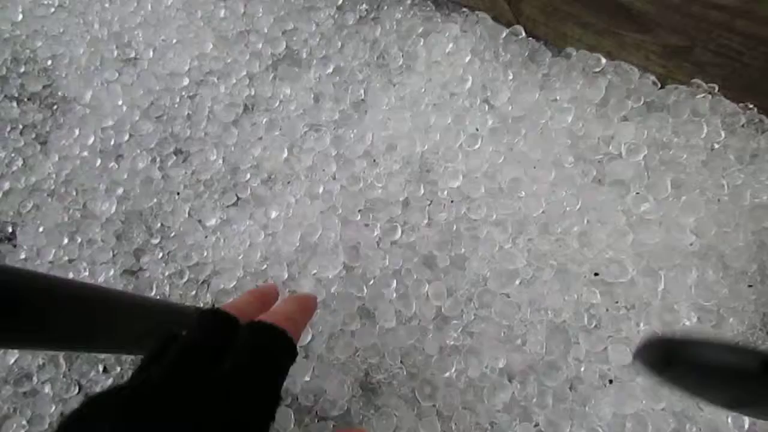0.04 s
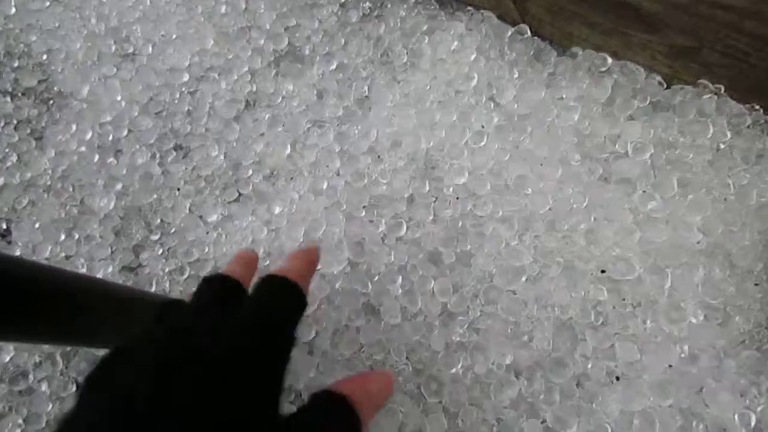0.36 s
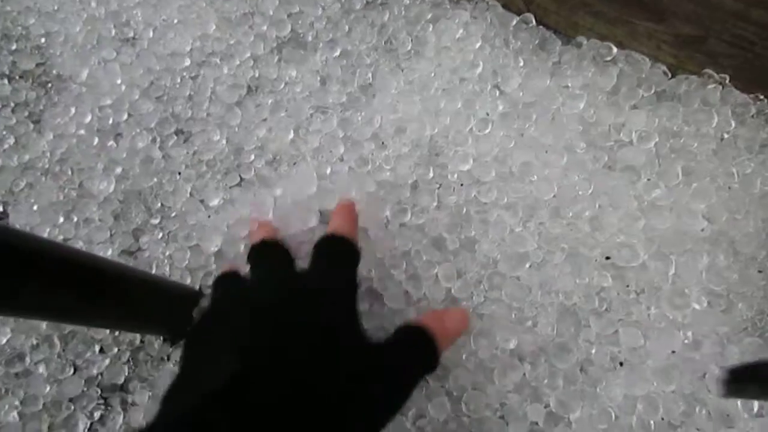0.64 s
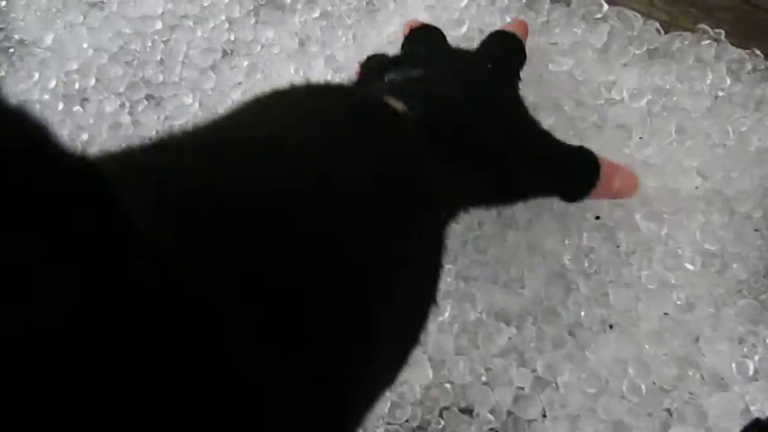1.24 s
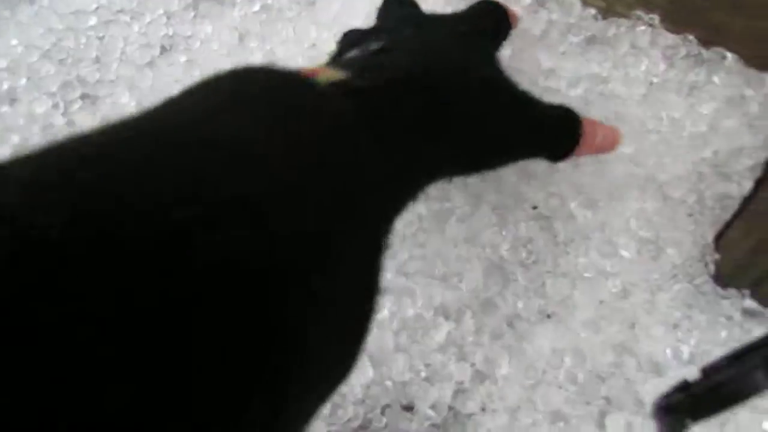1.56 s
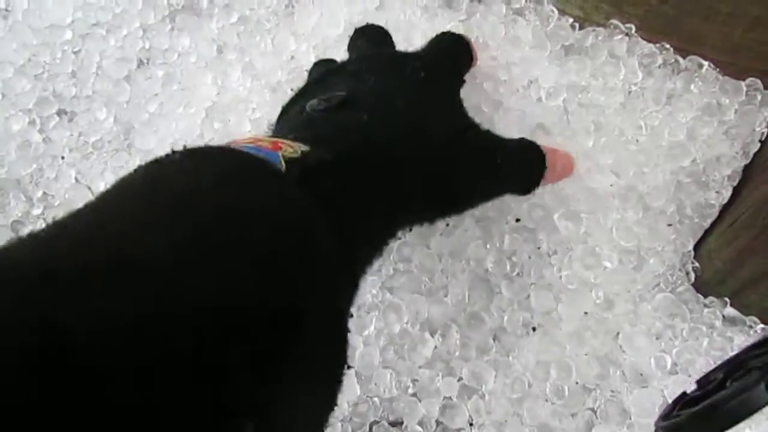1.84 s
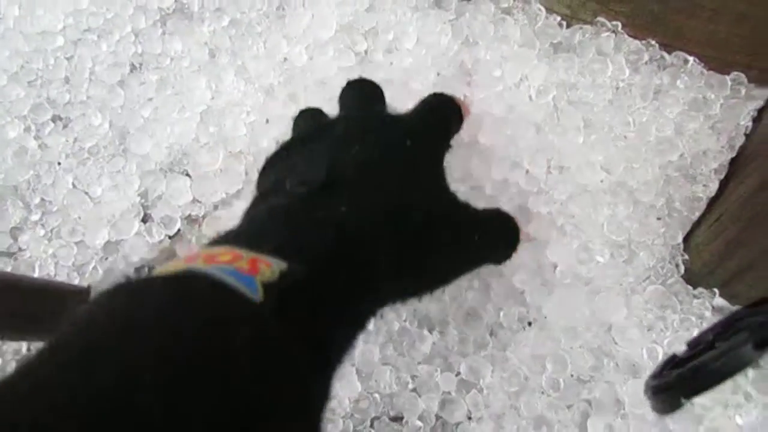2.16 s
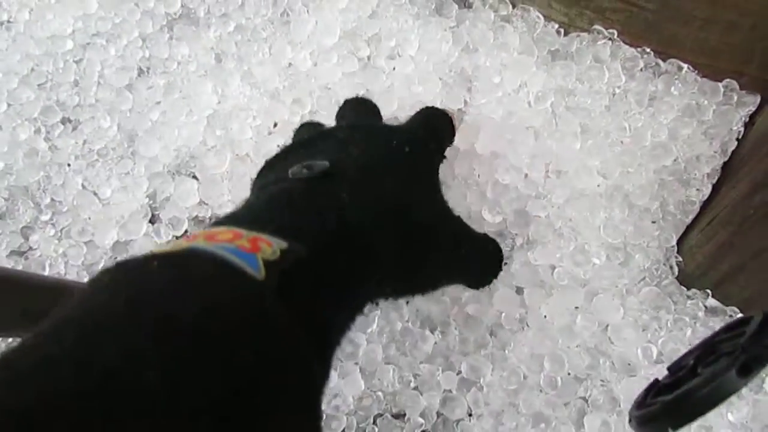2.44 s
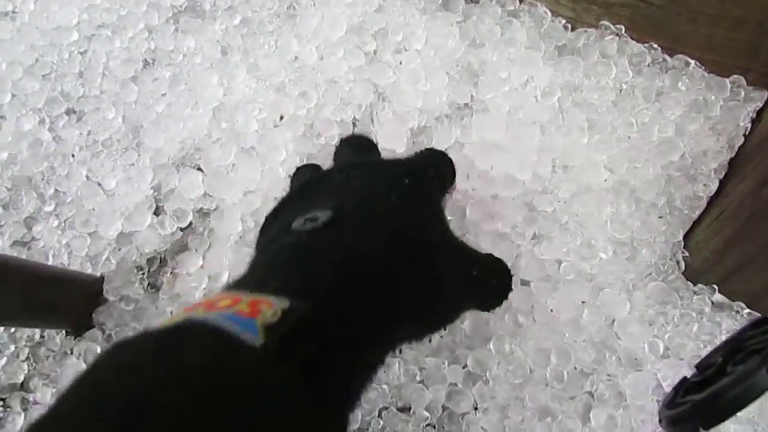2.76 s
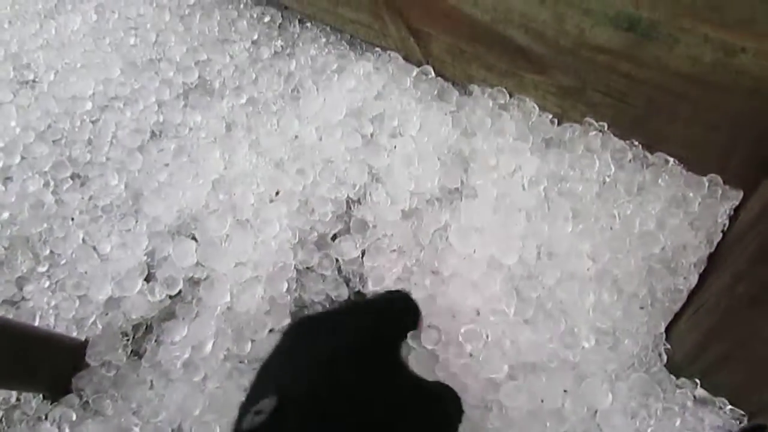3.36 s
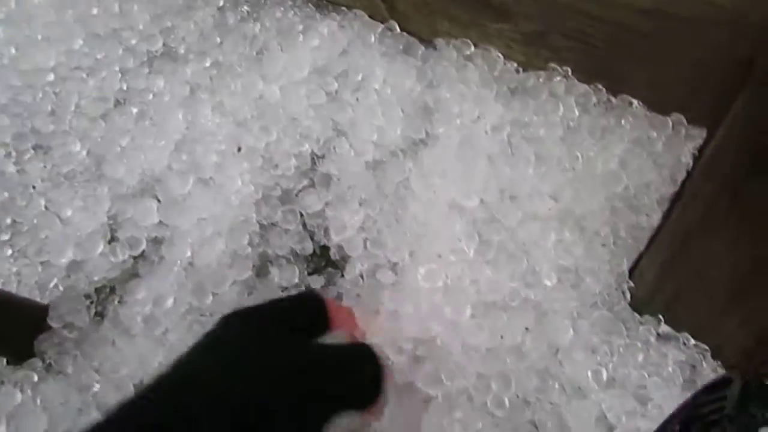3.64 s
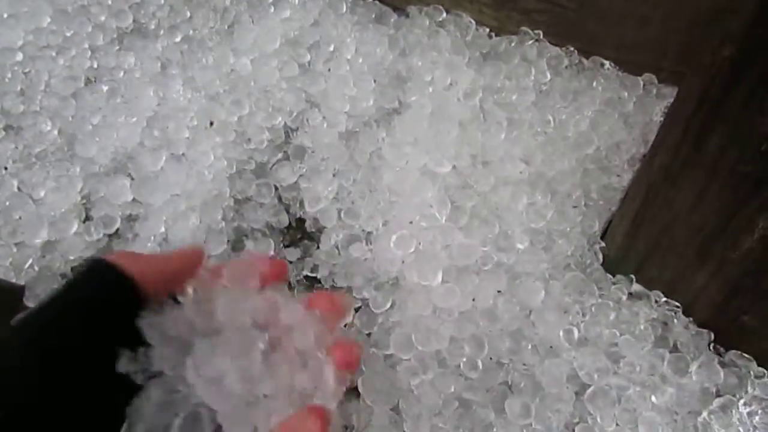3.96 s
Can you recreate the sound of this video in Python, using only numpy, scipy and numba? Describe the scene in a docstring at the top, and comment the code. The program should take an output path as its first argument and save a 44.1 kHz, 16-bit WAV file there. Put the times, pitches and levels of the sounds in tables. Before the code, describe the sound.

Hailstones crunch as a gloved hand rakes through them, with wind rumbling on the microphone.

```python
"""Wet hailstones crunch on a wooden deck as a gloved hand pushes into the heap and rakes them back.
Close to the microphone, the heap gives way in slips: showers of tiny ice contacts over a duller
rattle of the packed stones, with a few sharp snaps. Loose stones trickle back behind the hand.
Wind rumbles on the microphone, mostly on the left, over a faint outdoor hiss."""
import sys
import numpy as np
from scipy import signal
from scipy.fft import rfft, irfft
from scipy.io import wavfile
from numba import njit

SR = 44100
rng = np.random.default_rng(int(sys.argv[2]) if len(sys.argv) > 2 else 0)


def transcribe(u):
    """Save the signal u as a 16-bit wav file named by the first command-line argument.

    u: samples, shape (n,) or (channels, n), limited to [-1, 1]; the rate is SR.
    q: integer samples, one column per channel.
    """
    v = np.clip(np.atleast_2d(u).T, -1, 1)
    q = np.round(v * 32767).astype(np.int16)
    wavfile.write(sys.argv[1], SR, q)


N = 176400
T = np.arange(N) / SR
FREQ_HZ = np.fft.rfftfreq(N, 1 / SR)
SPLIT = np.array([[.5], [-.5]])  # shares a difference between left and right


def crunch(stir, left_louder_db=0.14):
    """Ice rubs on ice: dense tiny contacts, fewer ringing ticks, and sudden snaps."""
    # single stones snapping past each other: time_s, level_db
    snap_list = [(.466, -45), (.481, -27), (0.653, -28), (0.928, -24), (1.033, -25), (1.164, -31),
                 (1.260, -32), (1.396, -36), (1.632, -27), (1.676, -24), (1.690, -37), (1.732, -25.5),
                 (3.804, -32), (3.848, -37), (3.88, -34.5), (3.987, -35.5)]
    # tone of the ice on top of the heap and deep in it: pitch_hz, level_db
    top_ice = [(1200, -5.5), (2400, -3.5), (3100, -3.5), (4400, -4), (6400, 0), (8000, 0), (10500, 2),
               (12500, -3.5), (15500, -8)]
    deep_ice = [(1200, -26), (2400, -10), (3200, -6), (4000, -6), (5000, -5.5), (6400, -1.5), (7800, -1),
                (9200, -4), (11000, -5.5), (12500, -8), (15500, -17.5)]
    snap_fade_s = 0.0031
    snaps = sum(undb(db) * (T >= at) * np.exp(-np.abs(T - at) / snap_fade_s) for at, db in snap_list)
    contacts = grains(per_s=14000, spread_db=1, ring_s=0.00024, low_hz=1110, high_hz=16240)
    ticks = grains(per_s=1100, spread_db=2.5, ring_s=0.0013, low_hz=2310, high_hz=13650)
    ice = dig(contacts + undb(-9) * ticks, top_ice, deep_ice)
    return stereo(ice * np.hypot(stir, snaps)) * undb(-1 + SPLIT * left_louder_db)


def rattle(stir):
    """Packed stones knock together, with a duller tone shaped by the heap and the deck."""
    # tone of the packed stones under a flat hand and a dug-in hand: pitch_hz, level_db
    top_packed = [(60, -30), (150, -7), (300, -2), (430, 4.5), (570, -3), (760, -1), (950, 1), (1160, -5),
                  (1370, 3), (1490, -6.5), (1620, 4.5), (1850, -3), (2300, -4), (3000, -25), (5000, -28)]
    deep_packed = [(60, -30), (150, -17), (300, 4), (430, 0), (600, -4.5), (780, -3.5), (950, 1),
                   (1160, -2.5), (1360, 0.5), (1480, -3), (1600, 8), (1740, 1), (2300, -2.5), (3000, -15),
                   (5000, -30)]
    # how the rattle reaches the microphone's two sides: pitch_hz, left_louder_db, right_earlier_rad
    arrival = [(100, 13, 0), (350, 7.5, 1.48), (550, 4.5, 2.2), (810, 0.5, 1.44), (1040, 1, 0.6),
               (1500, 1, 0.17), (2300, -3.5, 0.51), (3500, -8, 0)]
    knocks = grains(per_s=3000, spread_db=2, ring_s=0.0017, low_hz=197, high_hz=3247)
    knocks = dig(knocks, top_packed, deep_packed)
    reference_db = -39.5
    strength = (stir / undb(reference_db)) ** 0.73  # grows more slowly than the crunch
    pair = stereo(knocks * strength) * undb(reference_db - 6.5)
    hz, left_louder_db, right_earlier_rad = np.array(arrival).T
    balance = undb(SPLIT * np.interp(FREQ_HZ, hz, left_louder_db))
    delay = np.exp(-1j * SPLIT * np.interp(FREQ_HZ, hz, right_earlier_rad))
    return irfft(rfft(pair) * balance * delay, N)


def hand_motion(fade_s=.012):
    """How hard the hand stirs the loose ice and the packed stones: steady drag plus sudden slips."""
    # drag of the hand between the slips: time_s, level_db
    drag = [(.43, -61), (.45, -49.5), (.56, -38), (.68, -33), (.79, -34), (.94, -32), (1.05, -36),
            (1.14, -55), (1.21, -47), (1.30, -47), (1.43, -38), (1.53, -44), (1.58, -46), (1.70, -45),
            (1.755, -43.5), (1.785, -58), (1.875, -51.5), (1.91, -42), (1.97, -35.5), (2.12, -44),
            (2.27, -45), (2.42, -42.5), (2.62, -36), (2.84, -38.5), (2.94, -38.5), (2.975, -58),
            (2.995, -42.5), (3.22, -43.5), (3.33, -32), (3.385, -39.5), (3.45, -44), (3.52, -35),
            (3.78, -42.5), (3.91, -50.5), (4.0, -55)]
    # the heap gives way: start_s, rise_s, hold_s, level_db, extra_rattle_db
    slips = [(0.439, 0.0063, 0.025, -33.5, -2), (.505, 0.0028, 0.01, -33.5, -2),
             (0.808, .005, .009, -24.5, -5), (0.832, .005, .016, -32.5, 6.5),
             (0.921, 0.0073, 0.089, -40.5, 11), (1.06, .005, .012, -38.5, 5.5),
             (1.102, .004, 0.0095, -45, 9), (1.146, 0.0018, .018, -42, 7),
             (1.229, 0.00092, 0.016, -39.5, 2), (1.283, 0.0065, 0.024, -43, 5),
             (1.352, .002, 0.014, -37.5, 2.5), (1.381, 0.004, 0.017, -33.5, 1.5),
             (1.429, 0.02, .004, -30.5, 7), (1.464, 0.0092, .004, -26.5, 7),
             (1.545, 0.0033, 0.0056, -38.5, -2), (1.593, 0.0037, 0.017, -30.5, 2.5),
             (1.635, 0.023, 0.035, -29.5, 5.5), (1.939, .006, .010, -40, 9), (1.952, .003, 0.0073, -26, 0),
             (1.968, 0.028, 0.042, -31.5, 4), (2.051, 0.0074, 0.016, -30, 4),
             (2.082, 0.0068, 0.034, -32, 1.5), (2.134, 0.012, 0.011, -27.5, 3.5),
             (2.178, .005, .010, -35.5, -1), (2.22, .016, 0.0063, -34.5, 1.5),
             (2.282, .005, 0.028, -41.5, 5), (2.325, 0.0042, 0.0096, -26.5, 1.5),
             (2.341, 0.0056, 0.027, -32.5, 3), (2.379, .004, 0.0067, -31, 0),
             (2.441, .010, 0.064, -29.5, 2), (2.501, 0.017, 0.022, -26, 0.5),
             (2.537, 0.0076, 0.029, -29, 4.5), (2.696, 0.0024, 0.0051, -24.5, -0.5),
             (2.721, .004, 0.009, -35, 7.5), (2.739, 0.0095, 0.0035, -27.5, 1.5),
             (2.767, 0.0089, .020, -30.5, 0.5), (2.804, 0.0078, 0.012, -32, -1),
             (2.853, 0.0028, 0.026, -29, 3.5), (3.040, 0.023, 0.013, -30, 0),
             (3.078, 0.01, 0.045, -29, 0.5), (3.133, .008, 0.038, -32.5, 1.5),
             (3.237, 0.015, 0.018, -27, -3.5), (3.267, .008, 0.021, -28, 0.5),
             (3.411, 0.017, 0.011, -42, 2), (3.466, .006, 0.013, -37.5, -14), (3.54, 0.016, .008, -38, -3),
             (3.904, .001, .002, -42, 4)]
    loose_power = curve(drag) ** 2
    packed_power = loose_power.copy()
    for start_s, rise_s, hold_s, level_db, extra_rattle_db in slips:
        age = T - start_s
        rise = np.clip(age / rise_s, 0, 1)
        fade = np.exp(-np.maximum(age - rise_s - hold_s, 0) / fade_s)
        slip = undb(level_db) * rise * fade
        loose_power += slip ** 2
        packed_power += (slip * undb(extra_rattle_db)) ** 2
    return np.sqrt([loose_power, packed_power]) * judder()


def judder(per_s=110, fade_s=.006, depth_db=0.94):
    """Stones stick and slip: tiny random jumps in level that start at once and die away."""
    gaps, sizes = rng.random((4000, 2)).T
    at = (np.cumsum(.5 + gaps) / per_s * SR).astype(int)
    kicks = np.bincount(at[at < N], sizes[at < N] ** 2, N)
    jolts = signal.lfilter([1], [1, -np.exp(-1 / (fade_s * SR))], kicks)
    return undb(depth_db * unit(jolts - jolts.mean()))


def dig(sound, top, deep, start_s=2.02, end_s=3):
    """The tone blends from the top of the heap to deep inside it as the hand sinks in."""
    depth = np.clip((T - start_s) / (end_s - start_s), 0, 1)
    return (1 - depth) * unit(colour(sound, top)) + depth * unit(colour(sound, deep))


def grains(per_s, spread_db, ring_s, low_hz, high_hz):
    """Stones touch at random, each contact with its own pitch, ring time, strength and place."""
    when, pitch, length, force, where = rng.random((int(per_s * N / SR), 5)).T
    hz = low_hz + (high_hz - low_hz) * pitch
    decay_s = ring_s * 2 ** (2 * length - 1)
    strength_db = -spread_db * np.log(np.maximum(force, .01))  # many weak, a few strong
    size = undb(strength_db) / np.sqrt(decay_s)  # a longer ring adds no energy
    place = np.sqrt(3) * (2 * where - 1)
    return unit(ring(when * N / SR, hz, decay_s, size, place))


@njit
def ring(start_s, hz, decay_s, size, place):
    """Each contact rings as a fading tone. Returns the centre sound and the left-right difference."""
    out = np.zeros((2, N))
    for k in range(len(start_s)):
        step = np.exp((2j * np.pi * hz[k] - 1 / decay_s[k]) / SR)
        tone = size[k] + 0j
        first = int(start_s[k] * SR)
        for i in range(first, min(N, first + int(5 * decay_s[k] * SR))):
            tone *= step
            out[0, i] += tone.imag
            out[1, i] += tone.imag * place[k]
    return out


def trickle():
    """Loose stones tumble back behind the hand with light, short clicks."""
    # loudness of the tumbling stones: time_s, level_db
    flow = [(.43, -75), (.5, -46), (1.0, -53), (1.65, -51), (1.8, -78), (2.1, -55), (2.97, -54), (3.5, -42),
            (3.8, -44), (4, -51)]
    # tone of their clicks: pitch_hz, level_db
    click_tone = [(1500, -40), (3000, -6), (4100, 3), (4900, -7), (7000, 0), (11000, 0.5), (15000, -8)]
    clicks = grains(per_s=2200, spread_db=2.6, ring_s=.0006, low_hz=2930, high_hz=15600)
    return stereo(unit(colour(clicks, click_tone))) * curve(flow)


def wind(flutter_db=1.14, likeness=0.45):
    """Gusts and short puffs of air hit the microphone, harder on the left than on the right."""
    # strength of the wind: time_s, level_db
    gusts = [(.24, -33), (.40, -30.5), (.50, -30.5), (.70, -34.5), (.80, -30.5), (.90, -33), (1.33, -36.5),
             (1.43, -31), (1.63, -36), (2.20, -39.5), (2.48, -38.5), (2.75, -40), (3.0, -40), (3.82, -39.5),
             (3.92, -41), (4.0, -42)]
    # tone of the rumble: pitch_hz, level_db
    rumble_tone = [(10, -45), (25, -26), (37, -11.5), (55, -5), (95, 0.5), (140, -3), (210, -3.5),
                   (280, -12), (400, -20), (700, -38), (1500, -46)]
    # low puffs as the arm moves: peak_s, half_length_s, pitch_hz, level_db
    puffs = [(0.267, 0.056, 200, -29.5), (0.375, 0.038, 90, -34), (0.677, 0.025, 143, -31),
             (0.768, 0.026, 189, -30.5), (1.44, 0.024, 150, -48), (1.553, 0.016, 196, -29.5),
             (2.308, 0.022, 89, -31), (2.381, .04, 113, -30), (2.86, 0.016, 130, -36),
             (3.955, 0.087, 110, -36.5)]
    # wind on the right compared with the left: time_s, level_db
    right_level = [(.3, -11), (2.4, -10.5), (3.0, -7), (4, -9)]
    rumble = unit(colour(rng.standard_normal((2, N)), rumble_tone))
    pair = rumble * curve(gusts) * undb(flutter_db * wander(per_s=25))
    swirls = rfft(rng.standard_normal((2, N)))
    for peak_s, half_length_s, pitch_hz, level_db in puffs:
        width_hz = 0.64 * pitch_hz
        band = (FREQ_HZ > 20) / (1 + ((FREQ_HZ - pitch_hz) / (width_hz / 2)) ** 2)
        swell = np.exp(-.5 * ((T - peak_s) / half_length_s) ** 2)
        pair += undb(level_db) * unit(irfft(swirls * band, N)) * swell
    left, unrelated = pair
    right = likeness * left + np.sqrt(1 - likeness ** 2) * unrelated
    return np.array([left, curve(right_level) * right])


def air():
    """Smooth, distant outdoor hiss."""
    # tone of the hiss: pitch_hz, level_db
    hiss_tone = [(200, 9), (900, 5), (1700, -1), (3000, -3), (5500, -7.5), (8000, -10), (12000, -34),
                 (16000, -30)]
    # loudness of the hiss: time_s, level_db
    hiss_level = [(.24, -45), (.45, -45), (1.8, -50.5), (4, -54.5)]
    hiss = unit(colour(rng.standard_normal((2, N)), hiss_tone))
    return stereo(hiss) * curve(hiss_level)


def stereo(pair):
    """Turn a centre sound and a left-right difference into left and right channels."""
    # how wide each pitch sounds: pitch_hz, difference_db
    width = [(300, -4.5), (700, 0.5), (1300, -3.5), (2400, -8), (3500, -13), (4400, -38), (5300, -35),
             (6500, -17), (8000, -10.5), (12000, -5.5), (15000, -2.5)]
    # the sound widens as the hand comes nearer: time_s, difference_db
    spread = [(.5, 0), (1.3, -4), (2.6, -2), (3.0, 0), (4, 2)]
    centre, difference = pair
    difference = colour(difference, width) * curve(spread)
    return np.array([centre + difference, centre - difference])


def colour(sound, rows):
    """Shape the tone with (pitch_hz, level_db) points and remove everything up to 20 Hz."""
    hz, db = np.array(rows).T
    gain = undb(np.interp(np.log(np.maximum(FREQ_HZ, 1)), np.log(hz), db))
    return irfft(rfft(sound) * gain * (FREQ_HZ > 20), N)


def curve(rows):
    """Gain over time from (time_s, level_db) points."""
    return undb(np.interp(T, *np.array(rows).T))


def wander(per_s):
    """Glide from one random value to the next."""
    return np.interp(T * per_s, np.arange(4096), rng.standard_normal(4096))


def undb(db):
    """Turn decibels into a gain to multiply by."""
    return 10 ** (np.asarray(db) / 20)


def unit(sound):
    """Scale to an average (rms) level of 1."""
    return sound / np.sqrt(np.mean(sound ** 2))


def scene():
    """Hailstones, wind and outdoor hiss together."""
    loose, packed = hand_motion()
    return crunch(loose) + rattle(packed) + trickle() + wind() + air()


def record(dry, start_s=.243, top_hz=15900):
    """The microphone opens after a moment of silence and cuts the highest treble."""
    opened = np.clip((T - start_s) / .002, 0, 1)
    treble_cut = signal.ellip(10, .2, 75, top_hz, fs=SR, output="sos")
    return signal.sosfilt(treble_cut, dry * opened)


dry = scene()
out = record(dry)
transcribe(out)
```